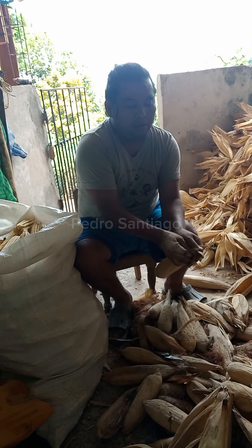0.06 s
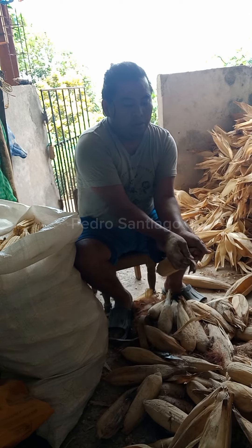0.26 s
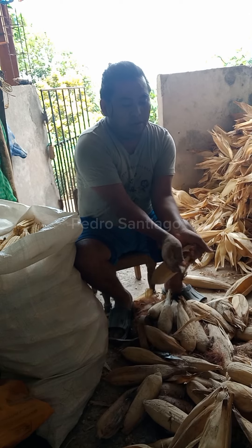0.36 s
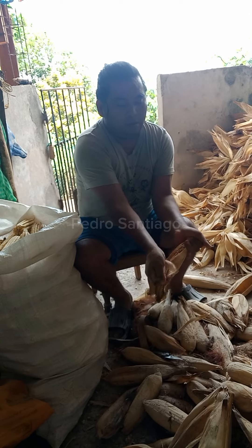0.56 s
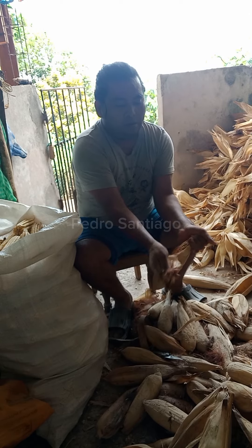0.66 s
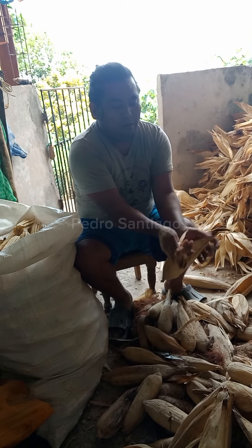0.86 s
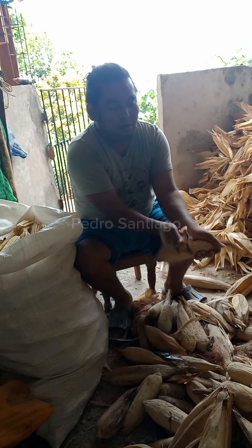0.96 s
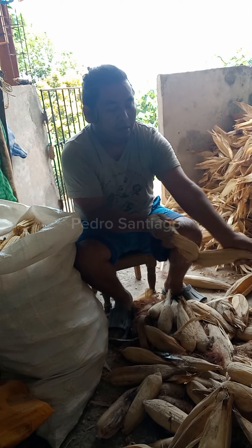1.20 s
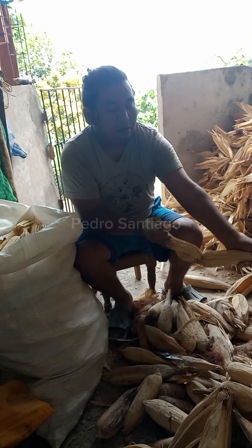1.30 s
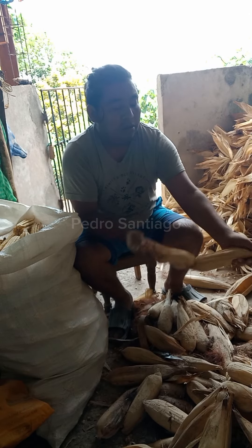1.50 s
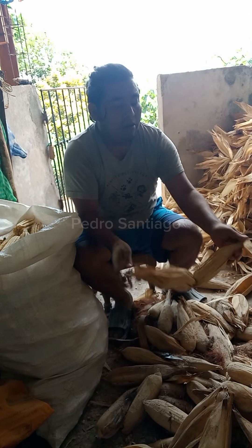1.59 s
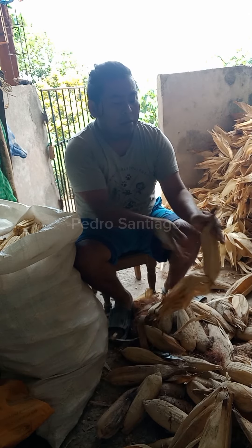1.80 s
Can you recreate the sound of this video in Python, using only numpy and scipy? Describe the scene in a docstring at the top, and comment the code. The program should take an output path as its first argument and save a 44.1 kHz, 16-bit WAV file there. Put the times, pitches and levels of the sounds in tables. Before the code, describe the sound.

Dry corn husk crackles lightly under gripping hands from 0 s, with small snaps before a loud, crunchy rip at about 0.26-0.55 s, ending in dull leaf flaps. A quieter regrip rustles until sharp cracks near 0.9 s; a second, brighter rip runs 1.0-1.25 s, ending in a rasp. Loose leaves rustle and snap at 1.4-1.7 s. Faint hum, rumble and hiss, close porch reflections.

```python
"""Dry corn husks are stripped from an ear by hand under a porch roof, over a faint low hum, rumble and hiss.
The grip works fine fibres, leaves and sheath (random tiny cracks) until ribs snap (single impulses and splinters).
The first rip adds flapping leaves (dull cracks) and folds that cave in (jolts through a pitched filter).
After a new grip, the second rip ends as the last strands rasp brightly; then the loose leaves are gathered.
Leaves and near walls scatter every crack (delays and decaying noise)."""
import sys
import numpy as np
from scipy import signal
from scipy.fft import rfft, irfft
from scipy.io import wavfile
from scipy.ndimage import uniform_filter1d

SR = 44100
rng = np.random.default_rng(int(sys.argv[2]) if len(sys.argv) > 2 else 0)


def output_pcm(signal):
    """Save a mono or channel-first signal as 16-bit PCM at the path in sys.argv[1].

    Samples are clipped to [-1, 1] before scaling.
    """
    pcm = np.clip(np.atleast_2d(signal).T, -1, 1) * 32767
    wavfile.write(sys.argv[1], SR, np.round(pcm).astype(np.int16))


N = 81585

# work of the husk under the hands, before layer gains: time_s, fibre_db, leaf_db, sheath_db
GRIP = [(0.0, -43, -42, -54), (0.042, -52, -47.5, -63), (0.12, -37, -41.5, -56), (0.15, -33, -28.5, -43),
        (0.18, -33, -30.5, -38), (0.208, -33, -35.5, -43), (0.254, -31, -33.5, -44.5)]
# same columns
FIRST_RIP = [(0.262, -25.5, -19, -29.5), (0.286, -20.5, -24, -23.5), (0.345, -23, -19, -30.5),
             (0.372, -21.5, -15.5, -18.5), (0.395, -23.5, -25, -30), (0.417, -27.5, -23, -34),
             (0.427, -26, -15.5, -16.5), (0.442, -23.5, -27, -35), (0.461, -19, -20.5, -13),
             (0.479, -21, -17, -15.5), (0.523, -25.5, -22, -26.5), (0.55, -37.5, -38, -44),
             (0.58, -45, -40, -44)]
# same columns
REGRIP = [(0.6, -42.5, -32, -43), (0.66, -45, -43.5, -40), (0.682, -47, -36, -36), (0.709, -44.5, -41, -48),
          (0.789, -31, -30.5, -36), (0.859, -33, -38, -47), (0.889, -33, -32, -33), (0.896, -16, -24, -39),
          (0.911, -33, -26.5, -49), (0.947, -31, -30.5, -36), (1.002, -27.5, -26.5, -32)]
# same columns
SECOND_RIP = [(1.011, -19.5, -29, -24.5), (1.052, -23, -19, -25.5), (1.082, -18, -22, -27),
              (1.099, -18, -18, -21.5), (1.131, -22, -18, -28), (1.148, -19, -17.5, -30),
              (1.16, -24.5, -22, -36), (1.168, -17, -22, -35), (1.209, -24, -20.5, -29),
              (1.241, -27.5, -33, -54), (1.3, -72, -54, -51)]
# same columns
GATHER = [(1.32, -54, -52.5, -53.5), (1.397, -37.5, -33.5, -45), (1.42, -39, -27.5, -39),
          (1.445, -35.5, -30, -37.5), (1.505, -34, -29, -43.5), (1.543, -28, -23, -39.5),
          (1.585, -31, -30.5, -33), (1.603, -33.5, -29, -35.5), (1.659, -32.5, -35, -39),
          (1.703, -40.5, -44, -57), (1.735, -59, -66, -75), (1.807, -46.5, -59, -82), (1.85, -31, -34, -41)]
PULL = np.vstack([GRIP, FIRST_RIP, REGRIP, SECOND_RIP, GATHER])
# spectrum of parting fibres and of a rib's sharp crack: freq_hz, relative_density_db
FIBRE_COLOUR = [(200, -34.5), (1500, -10), (5000, 0), (7800, -6), (10000, -3), (12700, 0), (16000, -3)]
# resonances of the husk: freq_hz, width_hz, lift_db
HUSK_MODES = [(510, 9.1, 4), (628, 70, 10), (985, 140, 4.5), (1162, 30, 6.5), (1472, 79, 7),
              (1686, 54, 9.5), (1817, 65, 4), (2004, 67, 7), (2360, 30, 5)]

LEAF_PER_S, LEAF_SPREAD_DB = 1800, 2
SHEATH_PER_S, SHEATH_SPREAD_DB = 1100, 2
SPLINTER_SPREAD_DB = 5
FIBRE_SCATTER_DB, SHEATH_SCATTER_DB = 6, -6  # scatter relative to direct sound
LEAF_LAG_S, EAR_LAG_S = 0.00022, 0.00004  # greatest left-right lag: spread leaves, ear itself


def undb(db):
    """Decibels to gain."""
    return 10 ** (np.asarray(db) / 20)


def unit(x):
    """Scale to an rms of 1."""
    return x / np.sqrt(np.mean(x ** 2))


def walk(rate_hz):
    """Slow random wander with a spread near 1: held noise, smoothed twice."""
    hold = int(SR / rate_hz)
    steps = np.repeat(rng.standard_normal(N // hold + 1), hold)
    return 1.7 * uniform_filter1d(uniform_filter1d(steps, hold), hold)[:N]


def colour(x, points, modes=(), size=8192):
    """Minimum-phase filter of unit energy from (Hz, dB) points, with resonances on top."""
    f_hz = np.maximum(np.arange(size // 2 + 1) * SR / size, 1)
    point_hz, point_db = np.array(points, float).T
    curve_db = np.interp(np.log(f_hz), np.log(point_hz), point_db)
    for centre_hz, width_hz, lift_db in modes:
        curve_db = curve_db + lift_db / (1 + (2 * (f_hz - centre_hz) / width_hz) ** 2)
    # fold the cepstrum to make the response causal
    cepstrum = irfft(np.log(undb(curve_db)))
    cepstrum[1:size // 2] *= 2
    cepstrum[size // 2 + 1:] = 0
    ring = irfft(np.exp(rfft(cepstrum)))
    return signal.fftconvolve(x, ring[None] / np.linalg.norm(ring), axes=1)[:, :N]


def cracks(per_s, spread_db):
    """Random tiny fractures of uneven size, each panned a little; power stays even as the rate changes."""
    pan_spread_db = 2  # per side, in opposite directions
    when = rng.random(N)
    size, sign, pan = rng.standard_normal((3, N))
    gain = undb(spread_db * np.clip(size, -2, 2)) / np.sqrt(per_s)
    train = (when < per_s / SR) * np.sign(sign) * gain
    return unit(train * undb(pan_spread_db * np.array([pan, -pan])))


def porch(x, scatter_db, lag_s, size=8192, count=6):
    """Each crack comes from one of several places with its own left-right lag, quick scatter and short tail."""
    scatter_decay_s, room_t60_s, room_db = 0.0065, 0.14, -4.5
    t = np.arange(size) / SR
    place = rng.integers(count, size=N)
    out = 0
    for k, lag in enumerate(np.linspace(-lag_s, lag_s, count)):
        delay = np.round(np.maximum([[lag], [-lag]], 0) * SR)
        direct = np.arange(size) == delay
        scatter = rng.standard_normal((2, size)) * np.exp(-t / scatter_decay_s)
        tail = rng.standard_normal((2, size)) * np.exp(-np.log(1000) * t / room_t60_s)
        echo = (undb(scatter_db) * unit(scatter) + undb(room_db) * unit(tail)) / np.sqrt(size)
        out = out + signal.fftconvolve(x * (place == k), direct + echo, axes=1)[:, :N]
    return out / np.sqrt(1 + undb(scatter_db) ** 2 + undb(room_db) ** 2)


def crackle(times_s, level_db, per_s, spread_db, scatter_db, lag_s):
    """Scattered cracks whose strength and rate follow the level; per_s is the rate at its peak."""
    t = np.arange(N) / SR
    strength = undb(np.interp(t, times_s, level_db))
    rate = per_s * (strength / strength.max()) ** 0.25  # a gentler pull makes fewer cracks
    active = (t >= times_s[0]) & (t <= times_s[-1])
    return porch(cracks(rate, spread_db) * strength * active, scatter_db, lag_s)


def background():
    """Wavering low hum over rumble, nearly the same on both sides, and thin hiss; the lows dip briefly."""
    # hum lines, before waver, drift and dip: freq_hz, rms_db
    hum_lines = [(69.5, -57.5), (97, -69), (139, -56)]
    # rumble spectrum: freq_hz, relative_density_db
    rumble_colour = [(20, -29), (42, -34), (65, 2), (125, -2.5), (170, -8.5), (310, -11.5), (430, -32.5),
                     (1200, -41.5)]
    # hiss spectrum: freq_hz, relative_density_db
    hiss_colour = [(400, -5.5), (1800, -14.5), (3000, -10.5), (5000, -0.5), (7900, -16.5), (8500, 2),
                   (9200, -21), (13000, -6.5), (16000, -18)]
    # gain of hum and rumble: time_s, gain_db
    low_dip = [(.9, 0), (1.05, -4.5), (1.33, -10), (1.5, 2), (1.8, -1)]
    waver_db, drift_hz = 4, 3.13
    rumble_db, rumble_side_db, hiss_db = -45.5, -11, -44
    hum = 0
    for hz, db in hum_lines:
        level = np.sqrt(2) * undb(db + waver_db * walk(12.0))
        phase = 2 * np.pi * np.cumsum(hz + drift_hz * walk(5.1)) / SR
        hum = hum + level * np.sin(phase)
    rumble_noise = rng.standard_normal(N) + undb(rumble_side_db) * rng.standard_normal((2, N))
    rumble = undb(rumble_db) * colour(rumble_noise, rumble_colour)
    hiss = undb(hiss_db) * colour(rng.standard_normal((2, N)), hiss_colour)
    dip = undb(np.interp(np.arange(N) / SR, *np.transpose(low_dip)))
    return dip * (hum + rumble) + hiss


def fibres():
    """Fine fibres part under the pull in dense, uneven tiny cracks."""
    gain_db, per_s, spread_db = 3.5, 3000, 5
    times_s, fibre_db, _, _ = PULL.T
    parting = crackle(times_s, fibre_db + gain_db, per_s, spread_db, FIBRE_SCATTER_DB, LEAF_LAG_S)
    return colour(parting, FIBRE_COLOUR)


def leaves():
    """Stiff leaves crack under the pull and excite the husk's resonances."""
    # leaf spectrum: freq_hz, relative_density_db
    leaf_colour = [(60, -32), (300, -44), (900, -22.5), (1400, -4), (1850, 0), (2800, 0), (3900, -4.5),
                   (5200, -7.5), (6500, -9.5), (8000, -17.5), (14000, -30)]
    times_s, _, leaf_db, _ = PULL.T
    bending = crackle(times_s, leaf_db, LEAF_PER_S, LEAF_SPREAD_DB, FIBRE_SCATTER_DB, LEAF_LAG_S)
    return colour(bending, leaf_colour, HUSK_MODES)


def sheath():
    """The sheath crumples on the ear in sparser, lower cracks that excite the husk's resonances."""
    # sheath spectrum: freq_hz, relative_density_db
    sheath_colour = [(30, -62), (100, -10), (200, -16.5), (330, -6.5), (420, -13.5), (520, 0.5), (640, -2),
                     (950, 3.5), (1300, -4.5), (1900, 0), (3000, -14), (8000, -33)]
    gain_db = 1
    times_s, _, _, sheath_db = PULL.T
    crumpling = crackle(times_s, sheath_db + gain_db, SHEATH_PER_S, SHEATH_SPREAD_DB,
                        SHEATH_SCATTER_DB, EAR_LAG_S)
    return colour(crumpling, sheath_colour, HUSK_MODES)


def snaps():
    """Each rib breaks with one sharp, bright crack and a dying spray of splinters."""
    # ribs that snap: start_s, crack_db, spray_db
    rib_breaks = [(0.1216, -8.5, -29), (.2148, -8, -22.5), (0.2602, 0, -36), (0.372, -10, -20),
                  (0.4192, 0, -29), (0.8924, 1.5, -30), (0.9152, 5, -22.5), (0.9254, 1, -19.5),
                  (1.007, 5.5, -28), (1.0203, 3, -25), (1.139, 5, -16.5), (1.1644, 7.5, -13),
                  (1.1727, 1, -37), (1.1903, -6, -18.5), (1.322, -16, -32.5), (1.3375, -18, -27.5),
                  (1.3736, -22, -27.5), (1.4133, -4, -20.5), (1.4857, -12, -27), (1.5338, -3, -20)]
    # splinter spectrum: freq_hz, relative_density_db
    rib_colour = [(60, -59), (300, -17), (1000, -4), (1900, 3.5), (5200, 6.5), (8000, -2.5), (12700, -4.5),
                  (16000, -2.5)]
    splinter_per_s, splinter_decay_s = 4500, 0.012
    splinter_scatter_db, crack_scatter_db = -1, -7
    crack, spray = np.zeros((2, 2, N))
    for start_s, crack_db, spray_db in rib_breaks:
        age_s = (np.arange(N) - int(start_s * SR)) / SR
        crack += undb(crack_db) * (age_s == 0)
        spray += undb(spray_db) * (age_s > 0) * np.exp(-np.abs(age_s) / splinter_decay_s)
    crack = porch(crack, crack_scatter_db, 0, count=1)
    splinters = spray * cracks(splinter_per_s, SPLINTER_SPREAD_DB)
    splinters = porch(splinters, splinter_scatter_db, LEAF_LAG_S)
    return colour(crack, FIBRE_COLOUR) + colour(splinters, rib_colour, HUSK_MODES)


def flap():
    """Leaves fold back with a dull flapping, strongest in the rips: low-coloured cracks."""
    # flapping: time_s, level_db
    flap_level = [(.24, -58), (0.404, -42.5), (0.424, -34), (.51, -27.5), (.56, -52), (.98, -52),
                  (1.12, -37.5), (1.32, -67), (1.6, -47.5), (1.75, -60)]
    # flap spectrum: freq_hz, relative_density_db
    flap_colour = [(40, -26), (150, -7), (270, 2), (335, 7), (600, -17), (2000, -43)]
    folding = crackle(*np.transpose(flap_level), SHEATH_PER_S, SHEATH_SPREAD_DB,
                      SHEATH_SCATTER_DB, LEAF_LAG_S)
    return colour(folding, flap_colour)


def crunches():
    """A sheath fold caves in with a jolt and buckles briefly, ringing at a pitch set by its size."""
    # folds that cave in: start_s, pitch_hz, level_db
    folds = [(0.273, 1710, 4.5), (.311, 1650, 1), (0.369, 1680, 4), (.4198, 680, 4), (0.4599, 1030, 5),
             (0.4662, 960, 2), (0.4811, 1230, 5), (.6152, 1900, -8), (.8927, 950, -2.5), (1.0198, 850, -6),
             (1.0595, 900, 3.5), (1.0752, 1700, -3), (1.1385, 740, 4.5), (1.147, 700, 2), (1.485, 1880, -5),
             (1.5349, 1870, -5), (1.598, 930, -10)]
    # fold spectrum: pitch_multiple, relative_density_db
    fold_shape = [(.08, -41), (.45, -14.5), (1, 4), (1.3, -9.5), (2.1, -9.5), (4, -17), (9, -46)]
    buckle_db, buckle_per_s, buckle_decay_s = -22, 1200, 0.009  # level relative to the jolt
    buckling = cracks(buckle_per_s, SPLINTER_SPREAD_DB)
    out = 0
    for start_s, pitch_hz, level_db in folds:
        age_s = (np.arange(N) - int(start_s * SR)) / SR
        jolt = age_s == 0
        decay = (age_s > 0) * np.exp(-np.abs(age_s) / buckle_decay_s)
        push = jolt + undb(buckle_db) * buckling * decay
        body = [(multiple * pitch_hz, db) for multiple, db in fold_shape]
        out = out + undb(level_db) * colour(porch(push, SHEATH_SCATTER_DB, 0, count=1), body)
    return out


def last_strands():
    """The last strands of the second rip give way in cracks coloured to a bright rasp."""
    # rasp: time_s, level_db
    strand_level = [(1.15, -48.5), (1.168, -20), (1.217, -22.5), (1.275, -46.5)]
    # rasp spectrum: freq_hz, relative_density_db
    strand_colour = [(300, -49), (2000, -26), (3800, 1.5), (4900, 4), (6500, -4), (10000, -17.5)]
    rasp = crackle(*np.transpose(strand_level), LEAF_PER_S, LEAF_SPREAD_DB, FIBRE_SCATTER_DB, LEAF_LAG_S)
    return colour(rasp, strand_colour)


def scene():
    """The husk, a touch to the left, in front of the background."""
    left_over_right_db = 0.66
    balance = undb(np.array([[left_over_right_db], [-left_over_right_db]]) / 2)
    husk = fibres() + leaves() + sheath() + snaps() + flap() + crunches() + last_strands()
    return background() + husk * balance


def record(dry):
    """Clip peaks at full scale, then cut the top with a steep low-pass."""
    top_hz = 15850
    low_pass = signal.ellip(10, 0.2, 70, top_hz, fs=SR, output="sos")  # ripple dB, stopband dB
    return signal.sosfilt(low_pass, np.clip(dry, -1, 1))


dry = scene()
out = record(dry)
output_pcm(out)
```